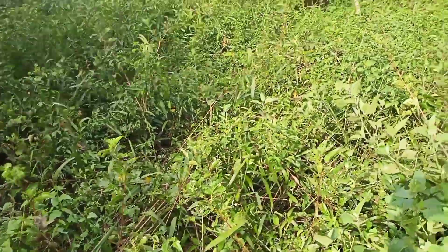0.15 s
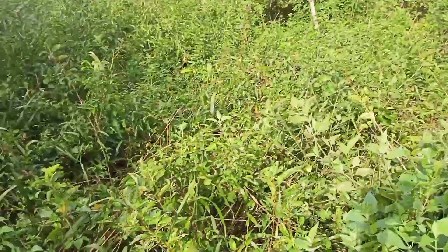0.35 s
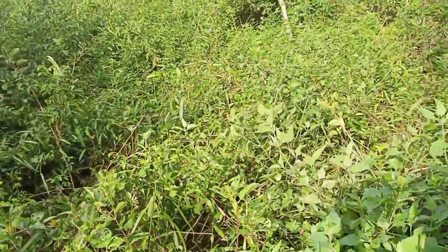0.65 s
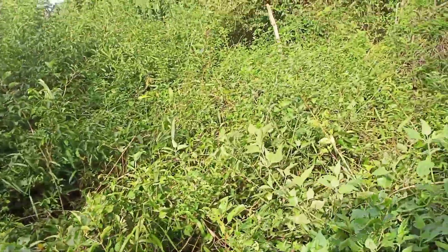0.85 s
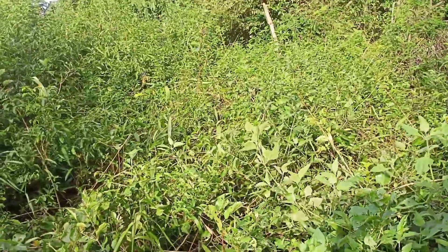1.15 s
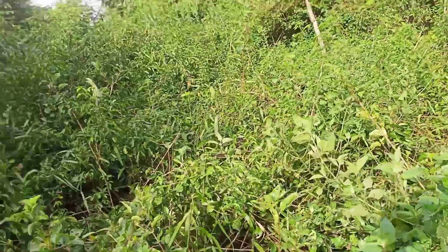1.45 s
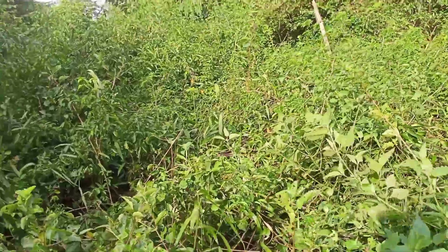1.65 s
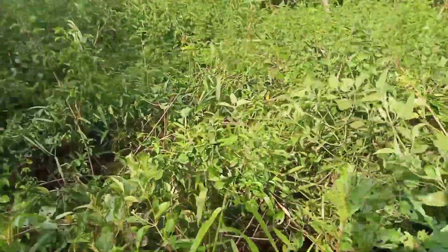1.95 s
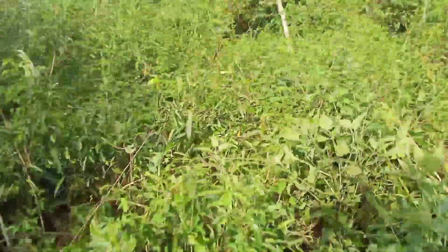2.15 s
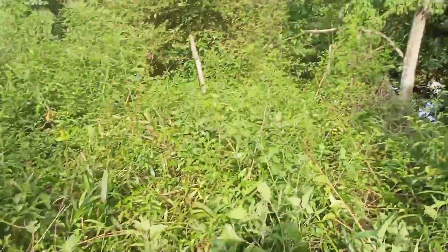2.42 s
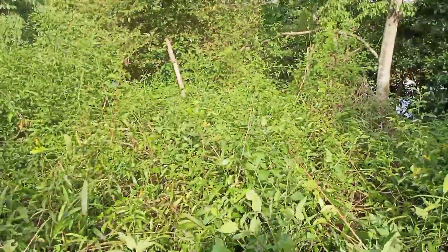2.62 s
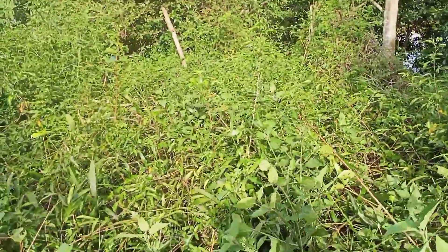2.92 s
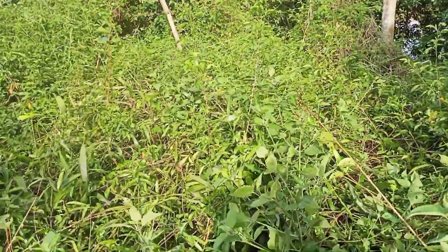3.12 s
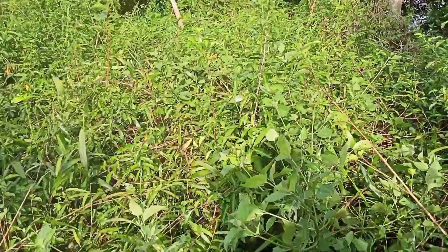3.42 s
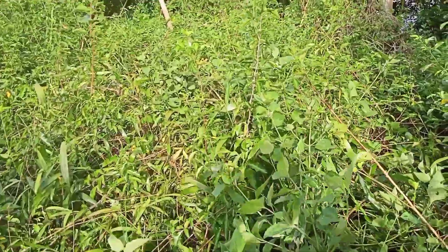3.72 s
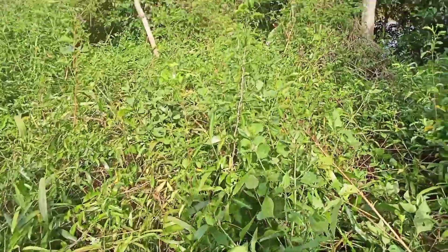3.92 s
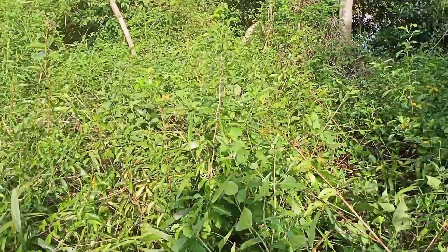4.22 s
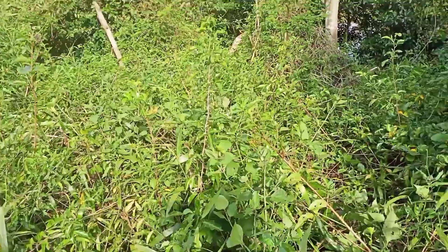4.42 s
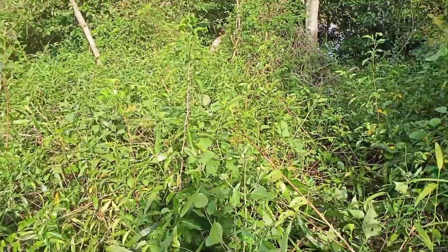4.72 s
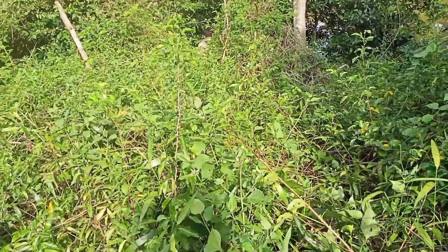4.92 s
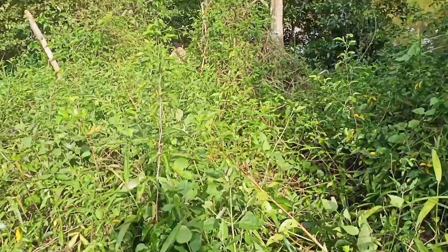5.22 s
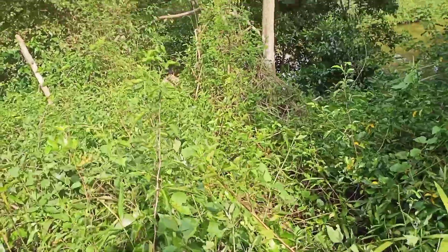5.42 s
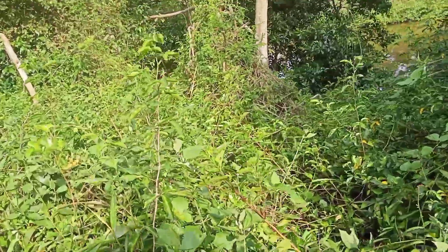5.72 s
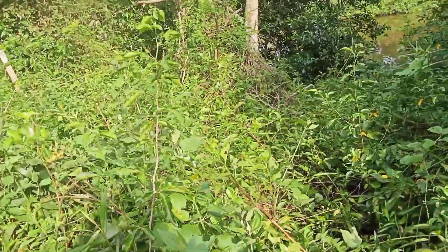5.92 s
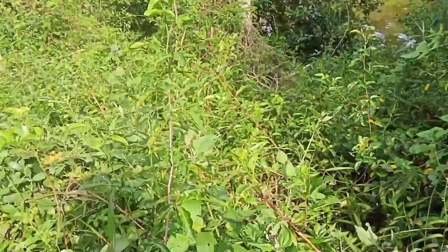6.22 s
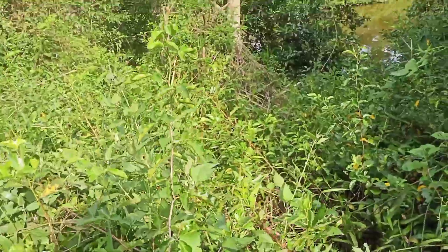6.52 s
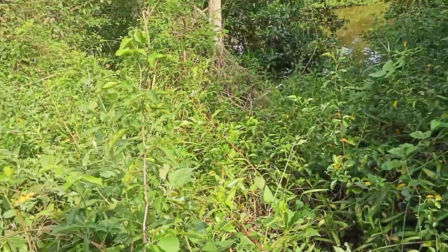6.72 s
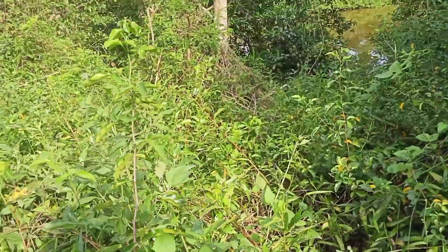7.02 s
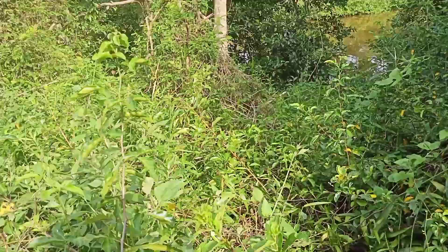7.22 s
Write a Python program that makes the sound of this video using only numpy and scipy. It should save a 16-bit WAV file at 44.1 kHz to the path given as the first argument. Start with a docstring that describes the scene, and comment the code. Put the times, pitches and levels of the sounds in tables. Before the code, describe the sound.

Close leafy brushing and dry twig crackle outdoors, with scattered sharp snaps and one hard knock against the handheld camera near the end.

```python
"""Wading through dense undergrowth

Leaves and grass brush past in swells: filtered noise under grainy contact envelopes.
Dry stalks crackle and snap: short noise bursts ring a resonance and scatter among the leaves.
A few stems knock the hand-held camera, each a pressure step that leaks away.
Slowly swelling noise makes a low outdoor murmur; a limiter holds down the strongest peaks."""
import sys
import numpy as np
from scipy import signal
from scipy.io import wavfile
from scipy.ndimage import uniform_filter1d, minimum_filter1d

SR = 44100
rng = np.random.default_rng(int(sys.argv[2]) if len(sys.argv) > 2 else 0)


def pcm_store(signal):
    """Save signal as 16-bit PCM."""
    levels = np.round(np.clip(np.atleast_2d(signal), -1, 1) * 32767)
    wavfile.write(sys.argv[1], SR, levels.astype(np.int16).T)


N = 324576

# Spectra of leaves, dry blades, finest treble and thick stems: (frequency [Hz], relative level per Hz [dB])
LEAF_SPECTRUM = [(500, -10.5), (900, -9), (1500, -2.5), (2400, 2), (3600, 3.5), (5000, -2), (7000, -11)]
FIZZ_SPECTRUM = [(2500, -13.5), (4500, -1), (6000, 2.5), (9000, 4), (11000, -29.5), (16000, -36)]
AIR_SPECTRUM = [(7000, -13.5), (10000, -0.5), (12000, 1.5), (16000, 1)]
STEM_SPECTRUM = [(60, -9), (150, -11.5), (300, -7), (550, -4.5), (900, -9.5), (1500, -19.5)]
# Weight on the thick stems and the ground, before brushing and wander: (time [s], level [dB])
TREAD = [(0.0, -46.5), (0.41, -48), (0.96, -57.5), (1.289, -51.5), (1.45, -43.5), (2.29, -51),
         (2.42, -43.5), (2.87, -49), (3.09, -42), (3.5, -53), (3.89, -60.5), (5.23, -40), (5.8, -46),
         (6.31, -53.5), (7.36, -47)]


def rustle():
    """Frictional excitation: the same leaf contacts shake leaves, dry blades and stems, so layers share one grain."""
    leaf_db, fizz_db, broad_db = sweeps()
    tread_db = np.interp(np.arange(N) / SR, *np.transpose(TREAD))
    brush_db = leaf_db - uniform_filter1d(leaf_db, SR // 4)  # each quick brush also moves the stems
    dry_db = leaf_db + fizz_db
    air_db = dry_db - 3.5 + 0.15 * (dry_db + 49.0)  # close, firm contacts carry more of the finest treble

    touch = grains(per_s=110.0, spread_db=0.5, t60=0.092, smooth=0.35)
    ticks = grains(per_s=300.0, spread_db=4.0, t60=0.016, smooth=2.6)  # small twigs, in the leaf band only
    leaf_noise, dry_noise, stem_noise = rng.standard_normal((3, N))

    # the exponents on touch set how strongly each layer follows the contacts
    brush = evened(colour(leaf_noise * touch ** 0.51 * ticks, LEAF_SPECTRUM))
    pops = gain_of(-5.5) * crackle(per_s=500, spread_db=4, cycles=2.2)
    leaves = evened(patchy(brush + pops, depth_db=1.6))
    leaves = leaves * gain_of(leaf_db + 0.8 * wander(per_s=32.0))
    low_pass = signal.butter(2, 1500., fs=SR, output="sos")
    broad = signal.sosfilt(low_pass, leaves)  # wide leaves flap lower
    leaves = leaves + (gain_of(broad_db) - 1) * broad

    fizz = evened(colour(dry_noise * touch, FIZZ_SPECTRUM)) * gain_of(dry_db - 1.5)
    air = evened(colour(dry_noise * touch ** 1.4, AIR_SPECTRUM)) * gain_of(air_db)
    stem_db = tread_db + 0.95 * brush_db + 0.73 * wander(per_s=52.0)
    stems = evened(colour(stem_noise * touch ** 0.9, STEM_SPECTRUM)) * gain_of(stem_db)
    return gain_of(-0.56) * (leaves + fizz + air + stems)


# A leg sweeps through the plants; levels before the layers are balanced:
# (full from [s], hold [s], leaf rustle [dB], dry fizz re rustle [dB], broad-leaf gain [dB])
SWEEPS = [(0.01, 0.01, -40.5, -2, 5), (0.171, 0.061, -36, -3, 7), (0.273, 0.18, -40, -3.5, 7.5),
          (0.45, 0.11, -38, -2.5, 7.5), (0.676, 0.071, -39.5, -3.5, 5.5), (0.88, 0.015, -48.5, -3, 10),
          (1.276, 0.11, -41, -5.5, 5), (1.366, 0.17, -39, -5.5, -4), (1.668, 0.076, -40.5, -5, -14),
          (1.791, 0.24, -35, -5, 3), (2.18, 0.085, -39.5, -5, 7), (2.31, 0.096, -33.5, -2, 4),
          (2.457, 0.15, -37.5, -4.5, 5.5), (2.732, 0.046, -40.5, -2, 5), (2.97, 0.14, -34, -7, 4.5),
          (3.143, 0.088, -31, -2, 4), (3.425, 0.045, -45, 1.5, 2), (3.677, 0.022, -44, -2.5, 3),
          (3.826, 0.01, -40.5, -3.5, 7.5), (3.98, 0.13, -49, 0, 8), (4.194, 0.26, -44, -3, 7),
          (4.413, 0.0089, -46.5, -3, 5), (4.522, 0.0059, -42, -2, 3), (4.657, 0.061, -40.5, -6, 9.5),
          (4.769, 0.038, -31.5, -7.5, 5), (4.966, 0.11, -38.5, -4.5, -1), (5.107, 0.22, -34.5, -1, -4),
          (5.398, 0.22, -35, 0, 0.5), (5.74, 0.19, -37, -2, 6.5), (6.053, 0.12, -41.5, -3.5, 4.5),
          (6.199, 0.01, -35.5, -9, 7), (6.285, 0.051, -38, -2.5, 7.5), (6.402, 0.067, -45.5, -6, 2),
          (6.51, 0.048, -39, -4.5, 6.5), (6.667, 0.024, -35, -0.5, 4.5), (6.72, 0.028, -56, -6, 10),
          (6.848, 0.018, -39.5, -8, 7), (6.94, 0.094, -37, -8, 2), (7.108, 0.34, -40, -2.5, -17)]
# The plants between sweeps: (leaf rustle [dB], dry fizz re rustle [dB], broad-leaf gain [dB])
REST = (-58.5, -5, 1.7)
RISE_DB_PER_S, SETTLE_DB_PER_S = 256, 94  # how fast a sweep swells and dies away


def sweeps():
    """Power addition of incoherent sources: levels of rustle, fizz and broad leaves over the resting plants."""
    t = np.arange(0, N / SR + .01, .002)
    start, hold, db, fizz_db, broad_db = np.transpose(SWEEPS)[:, :, None]
    swell_db = -RISE_DB_PER_S * np.maximum(start - t, 0)
    settle_db = -SETTLE_DB_PER_S * np.maximum(t - start - hold, 0)
    power = gain_of(2 * (db + swell_db + settle_db))
    rest = gain_of(2 * REST[0])
    total = rest + power.sum(0)

    curves = [10 * np.log10(total)]
    for at_rest, column in zip(REST[1:], (fizz_db, broad_db)):
        curves.append((rest * at_rest + (power * column).sum(0)) / total)  # power-weighted mean
    return [np.interp(np.arange(N) / SR, t, curve) for curve in curves]


def grains(per_s, spread_db, t60, smooth):
    """Shot process: many uneven contacts, each starting at once and decaying fast (t60 in s), over a smooth brush."""
    size = gain_of(spread_db * np.minimum(rng.exponential(1, N), 2.5))
    size = size * (rng.random(N) < per_s / SR)
    power = signal.lfilter([1], [1, -gain_of(-120 / (t60 * SR))], size ** 2)
    return np.sqrt(smooth + power / power.mean())


def crackle(per_s, spread_db, cycles, count=24):
    """Elastic buckling of dry leaves: dense uneven pops, each a damped sine lasting a few cycles at its own pitch."""
    size = gain_of(spread_db * np.minimum(rng.exponential(1, N), 3))
    size = size * (rng.random(N) < per_s / SR)
    leaf = rng.integers(0, count, N)
    t = np.arange(512) / SR
    pitch_hz = np.geomspace(700, 9000, count)[:, None]
    pops = np.sin(2 * np.pi * pitch_hz * t) * np.exp(-t * pitch_hz / cycles)
    pops = pops / np.linalg.norm(pops, axis=1, keepdims=True)
    total = sum(signal.oaconvolve(size * (leaf == k), pop)[:N] for k, pop in enumerate(pops))
    return evened(colour(total, LEAF_SPECTRUM))


def patchy(x, depth_db):
    """Time-varying spectrum: as leaves come into play, patches some 700 Hz by 40 ms rise and sink at random."""
    z = signal.stft(x, nperseg=256, noverlap=192)[2]
    patches = uniform_filter1d(rng.standard_normal(z.shape), size=4, axis=0)
    patches = uniform_filter1d(patches, size=28, axis=1)
    return signal.istft(z * gain_of(depth_db * evened(patches)), nperseg=256, noverlap=192)[1][:N]


# Breaking stalks; levels before the three parts are balanced:
# (time [s], body peak level [dB], stalk pitch [Hz], crisp edge re body [dB], hollow thud re body [dB])
SNAPS = [(0.0075, -13.5, 4500, -14, -25), (0.282, -22.5, 1890, 2.5, -14), (0.399, -22.5, 2000, -7, -17),
         (0.466, -22, 1500, -5, -6), (0.477, -16.5, 2000, -9, -7), (0.499, -15.5, 3500, -16, -18),
         (0.671, -16.5, 1550, -15, -14), (0.682, -19, 1920, -8.5, -6.5), (0.873, -23, 1100, -29, -7.5),
         (1.235, -24.5, 2490, -31, -16), (1.249, -20, 2700, -32, -13), (1.27, -20.5, 2550, -25, -9),
         (1.472, -18, 2600, -20, -15), (1.546, -16.5, 2520, -29, -28), (1.648, -8.5, 3300, -34, -31),
         (1.729, -15.5, 2500, -15, -11.5), (1.806, -29, 2500, -25, -20), (1.849, -14, 2500, -10, -23),
         (1.86, -9.5, 2080, -14, -9), (1.912, -2, 3020, -12, -18.5), (1.942, -9.5, 2300, -6, -10),
         (1.986, -15, 2510, -6, -18), (1.997, -15, 3230, -6, -19), (2.005, -3, 2400, -14, -17.5),
         (2.023, -1.5, 3040, -11.5, -22), (2.044, -17.5, 935, 2.5, -10), (2.057, -6.5, 3830, -23, -42),
         (2.072, -14.5, 2500, -20, -22), (2.088, -17.5, 2330, -12, -24), (2.148, -15.5, 2740, -28, -30),
         (2.176, -19.5, 1480, -25, -18), (2.233, -12.5, 2800, -16, -5.5), (2.239, -1.5, 2640, -11, -39),
         (2.279, -11.5, 1600, -27, -14), (2.32, -19, 2510, 3, -7), (2.372, -13, 2460, -5.5, -13),
         (2.488, -15, 1750, -3, -18), (2.607, -16.5, 1280, -11, -18), (2.741, -13.5, 3300, -23, -10.5),
         (2.822, -16, 3060, -24, -18), (2.843, -11, 3060, -32, -34), (2.89, -15.5, 1580, -6.5, -7),
         (2.939, -11, 2500, -1.5, -16), (2.979, -5.5, 1350, -5.5, -13), (3.041, -15.5, 2150, -2.5, -23),
         (3.048, -13.5, 2000, -18, -23), (3.114, 3, 2680, -26, -42), (3.133, -10, 2530, -7, -18),
         (3.173, -7, 2100, -12, -26), (3.219, -7.5, 1940, -13, -12), (3.243, -15, 1270, -0.5, -11),
         (3.314, -15, 2770, -14.5, -19), (3.458, -4, 2200, -7, -13.5), (3.669, -25.5, 1210, -2, -14),
         (3.833, -16.5, 2380, -3.5, -29), (4.184, -25, 3200, -8, -20), (4.2186, -15, 1860, -9, -10),
         (4.25, -13, 2550, -10, -15), (4.291, -13, 2040, -1.5, -14), (4.506, -11.5, 3860, -9, -12),
         (4.519, -14.5, 1400, -15, -4), (5.006, -17, 3070, -12, -24), (5.107, -15, 2550, -0.5, -19),
         (5.2865, 0.5, 2260, -6.5, -8.5), (5.422, -15, 2800, -10, -28), (5.451, -9, 3800, -11, -26),
         (5.569, -6, 2000, 2, -9), (5.585, -8.5, 3280, -21, -8.5), (5.591, -11, 2490, -7, -14),
         (5.629, -15, 3520, -5, -7.5), (5.647, -17, 2800, -7, -11), (5.726, -7.5, 1890, -3.5, -12),
         (5.759, -4, 2500, -5, -14.5), (5.764, 6, 3100, -11.5, -10.5), (5.788, -8, 3430, -26, -24),
         (5.922, -14, 2210, 3, -6.5), (6.015, -11, 2120, -12, -31), (6.063, -13.5, 2150, -0.5, -10),
         (6.173, -18.5, 2080, -7, -27), (6.202, -9, 2500, -6, -12), (6.208, -10.5, 990, -1, -5.5),
         (6.225, -13, 3200, -7, -17), (6.293, -15.5, 2820, -7.5, -22), (6.495, -28, 1790, -7, -19),
         (6.581, -17, 1800, -7.5, -17), (6.66, -12, 1890, -6.5, -12), (6.75, -16, 2500, -2, -12),
         (6.797, -15.5, 2460, -19, -20), (6.985, -23, 700, -6, -4), (7.03, -23, 2000, -3, -15),
         (7.174, -24.5, 2200, -8, -9), (7.27, -20.5, 2100, -10, -1)]
SCATTER_T60, SCATTER_SLOPE = 0.066, 0.44  # s for a 2 kHz stalk; thicker, lower stalks scatter longer


def snaps():
    """Impulsive excitation of a damped resonator: parting fibres ring the stalk and leaves scatter the crack."""
    body, edge, thud = np.zeros((3, N))
    t = np.arange(4000) / SR
    onset = np.clip((t - .0005) / .0001, 0, 1)
    crack = onset * gain_of(-60 * np.maximum(t - .0016, 0) / .008)  # a few fibres part within milliseconds
    first = gain_of(16.5) * (np.arange(len(t)) == round(.0007 * SR))  # the first fibre parts in one sharp jolt

    chance = rng.standard_normal((len(SNAPS), 4, len(t)))
    for (s, db, hz, edge_db, thud_db), noises in zip(SNAPS, chance):
        body_noise, edge_noise, thud_noise, ragged_noise = noises
        t60 = np.clip(SCATTER_T60 * (2000 / hz) ** SCATTER_SLOPE, .01, .3)
        ragged_db = 0.97 * evened(uniform_filter1d(ragged_noise, size=90))  # late fibres part unevenly
        scatter = (t > .0005) * gain_of(-1.0 + ragged_db - 60 * t / t60)

        # a stalk is a poor resonator: a broad band with steep skirts
        r = np.exp(-np.pi * 1.05 * hz / SR)
        stalk = [0.95, 0.022, -0.996, 1, -2 * r * np.cos(2 * np.pi * hz / SR), r * r]
        ring = signal.sosfilt([stalk, stalk], first + body_noise * (crack + 0.45 * scatter))

        add(body, s, gain_of(db) * ring / abs(ring).max())
        add(edge, s, gain_of(db + edge_db) * (first + edge_noise * (crack + scatter)))
        add(thud, s, gain_of(db + thud_db) * thud_noise * (crack + 0.98 * scatter))
    crisp = gain_of(-8.5) * colour(edge, FIZZ_SPECTRUM) + gain_of(-8.0) * colour(edge, AIR_SPECTRUM)
    return gain_of(-4.5) * body + crisp + gain_of(5.5) * colour(thud, STEM_SPECTRUM)


# Stems that strike the camera and push the air in its port:
# (time [s], pressure step [dB], linear rise [s], leak time constant [s])
KNOCKS = [(5.2874, -10.5, .00008, .012), (5.763, -14.5, .00008, 0.011), (6.7280, 16, 0.000025, .0105),
          (6.7974, -6.5, 0.00026, 0.00025)]


def knocks():
    """Pressure relaxation: each knock is a quick rise of pressure that leaks away exponentially."""
    out, t = np.zeros(N), np.arange(SR // 4) / SR
    for s, db, rise, leak in KNOCKS:
        add(out, s, gain_of(db) * np.minimum(t / rise, 1) * np.exp(-t / leak))
    return out


# Spectrum of far air and foliage: (frequency [Hz], relative level per Hz [dB])
MURMUR_SPECTRUM = [(30, 22), (90, 9.5), (200, -6), (330, -1), (600, -7), (1000, -14), (2200, -5.5),
                   (5000, -27), (16000, -30)]
MURMUR_DB = -43  # level about which it swells, before the port


def murmur():
    """Diffuse ambient noise: far air and foliage, swelling slightly."""
    swell_db = 1.2 * wander(per_s=4)
    noise = evened(colour(rng.standard_normal(N), MURMUR_SPECTRUM))
    return gain_of(MURMUR_DB + swell_db) * noise


def gain_of(db):
    """Logarithmic level: decibels to amplitude."""
    return 10 ** (np.asarray(db) / 20)


def evened(x):
    """Energy normalisation: scales to rms 1."""
    return x / np.sqrt(np.mean(x ** 2) + 1e-20)


def add(mix, s, sound):
    """Linear superposition: mixes a sound in at time s, in seconds."""
    part = mix[round(s * SR):][:len(sound)]
    part += sound[:len(part)]


def colour(x, points):
    """Minimum phase: a causal filter from (Hz, dB) points, whose phase follows from the log gain."""
    hz, db = np.transpose(points)
    bins_hz = np.fft.rfftfreq(4096, 1 / SR)
    log_gain = np.interp(np.log(bins_hz + 1), np.log(hz), db) * np.log(10) / 20
    both_sides = np.r_[log_gain, log_gain[-2:0:-1]]
    response = np.exp(np.conj(signal.hilbert(both_sides)))
    taps = np.fft.ifft(response).real[:2048]
    return signal.oaconvolve(x, taps)[:len(x)]


def wander(per_s):
    """Low-pass random process: noise averaged twice over 1/per_s seconds, at rms 1."""
    width = int(SR / per_s)
    return evened(uniform_filter1d(uniform_filter1d(rng.standard_normal(N), width), width))


def scene():
    """Superposition: all sources at the one microphone."""
    return (rustle() + snaps() + knocks() + murmur())[None]


# The microphone port rings at three places: (frequency [Hz], gain [dB])
PORT = [(1000, 3.5), (2500, 1.5), (4000, -2), (6000, -8), (7200, -5.5), (8100, 1.5), (9300, -6),
        (11500, -7), (13500, -5), (15000, -0.5), (15500, 5)]
LOW_CUT_HZ, EDGE_HZ = 89.8, 15550  # bass cut and upper band limit


def record(dry):
    """Transducer response and gain control: port colour, bass cut, look-ahead limiter, band limit."""
    x = colour(dry[0], PORT)
    bass_cut = signal.butter(4, LOW_CUT_HZ, "high", fs=SR, output="sos")
    x = signal.sosfilt(bass_cut, x)  # turns pressure steps into swings

    over_db = np.maximum(20 * np.log10(abs(x) + 1e-9) - 1.2, 0)  # brief peaks pass and clip
    ahead = round(.019 * SR)
    over_db = -minimum_filter1d(-over_db, ahead, origin=-(ahead // 2))  # sees the peak coming
    fall = np.arange(N) * 220 / SR  # recovers 220 dB a second
    held_db = np.maximum.accumulate(over_db + fall) - fall
    x = x / gain_of(uniform_filter1d(held_db, size=200))

    band = signal.firwin(401, EDGE_HZ, window=("kaiser", 9), fs=SR)
    return np.clip(signal.oaconvolve(x, band, "same"), -1, 1)[None]


dry = scene()
out = record(dry)
pcm_store(out)
```